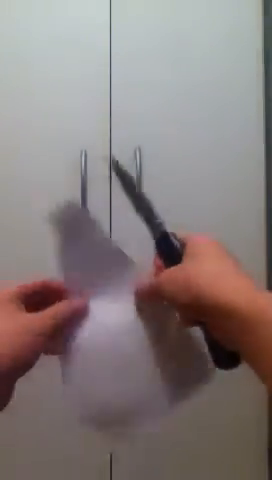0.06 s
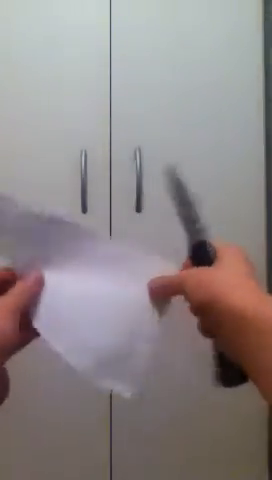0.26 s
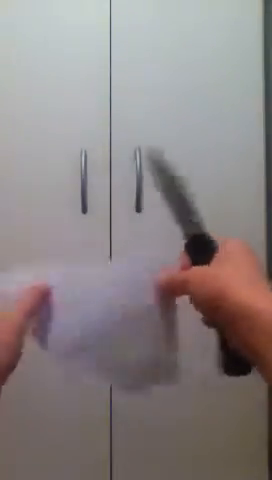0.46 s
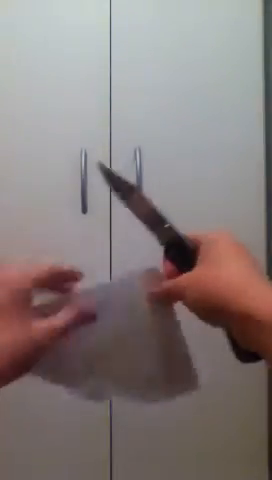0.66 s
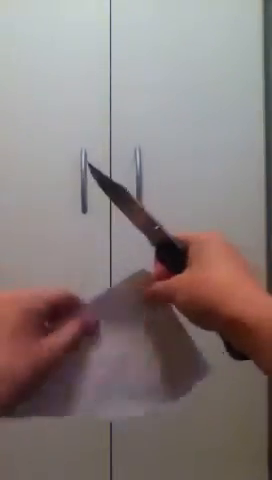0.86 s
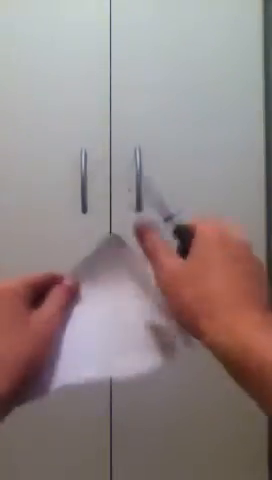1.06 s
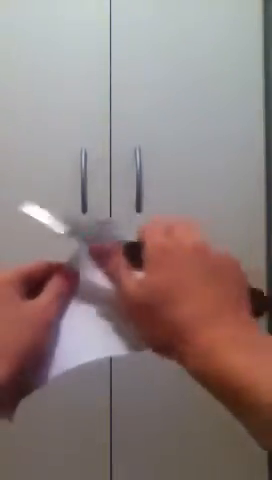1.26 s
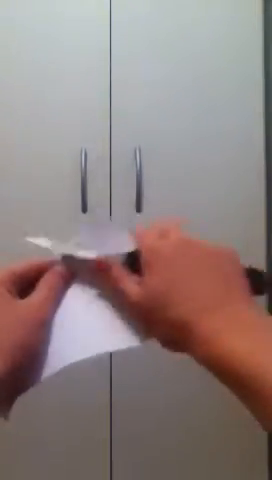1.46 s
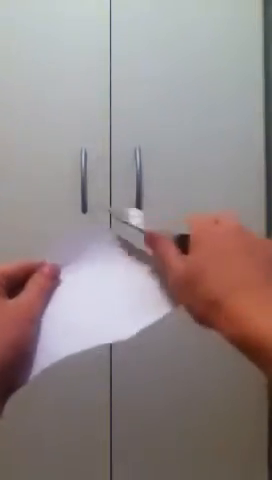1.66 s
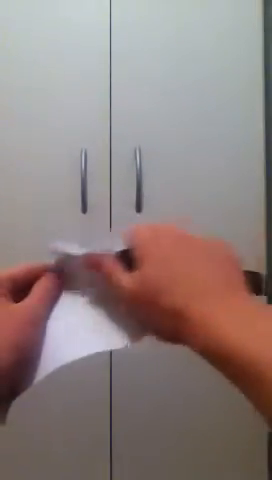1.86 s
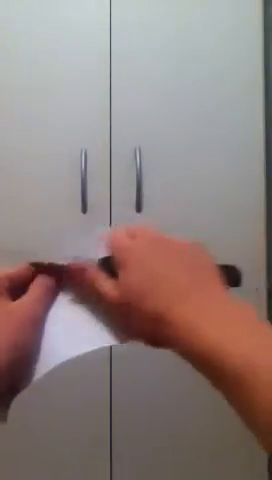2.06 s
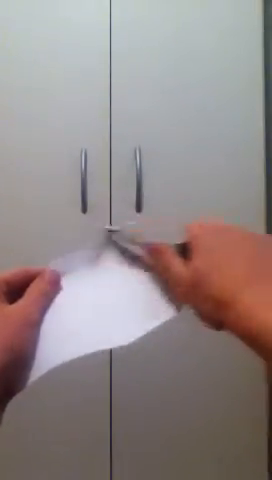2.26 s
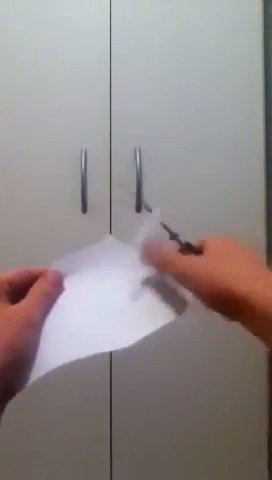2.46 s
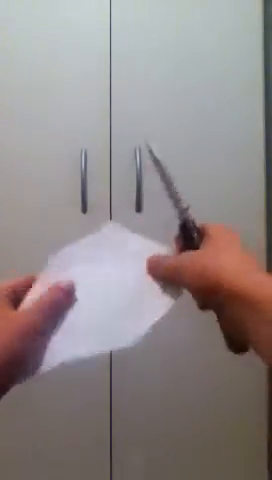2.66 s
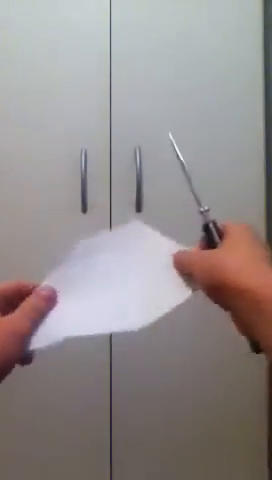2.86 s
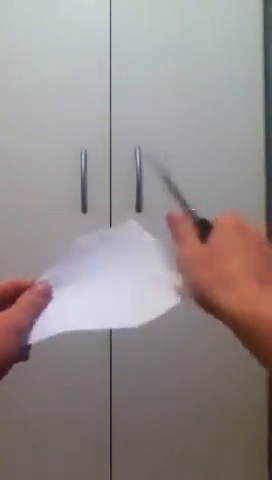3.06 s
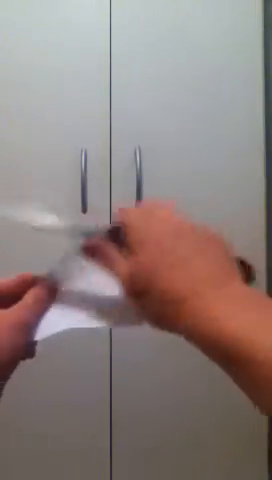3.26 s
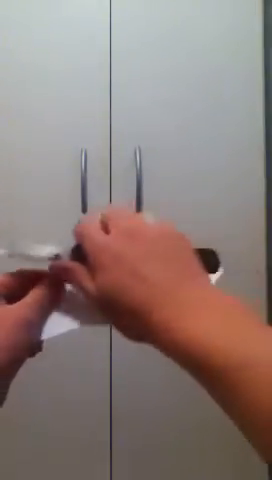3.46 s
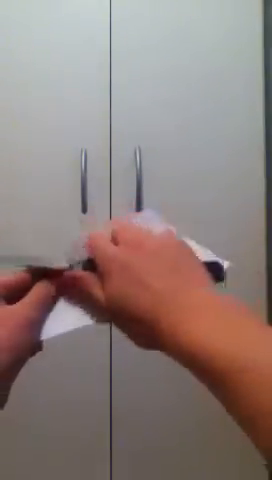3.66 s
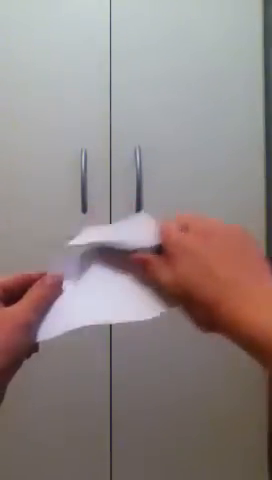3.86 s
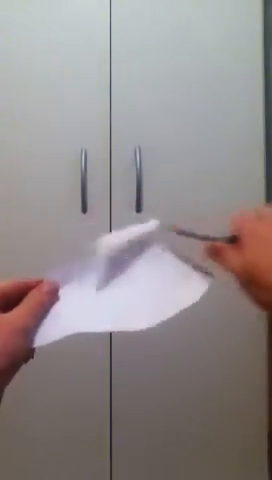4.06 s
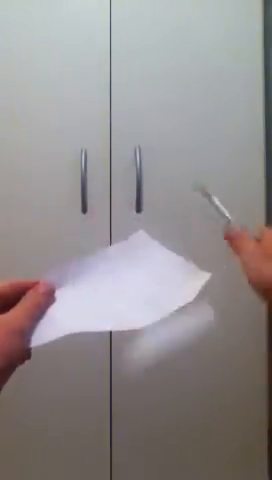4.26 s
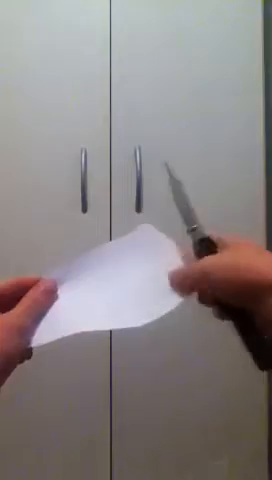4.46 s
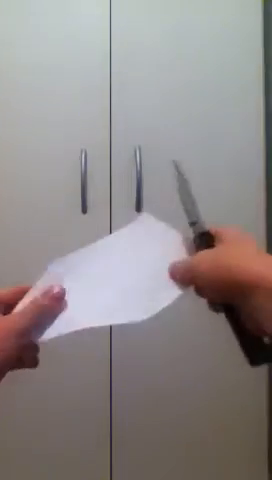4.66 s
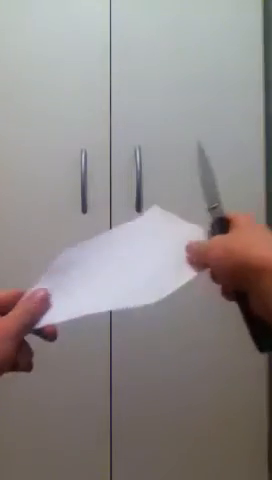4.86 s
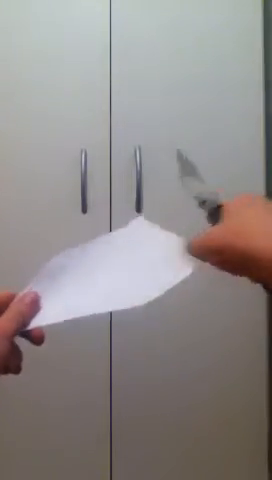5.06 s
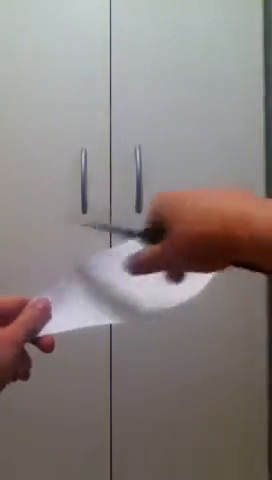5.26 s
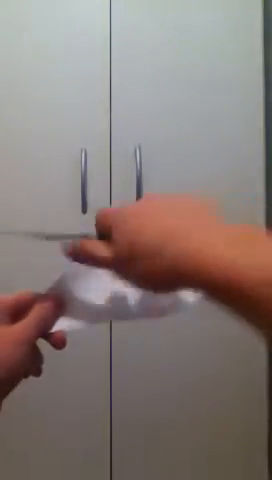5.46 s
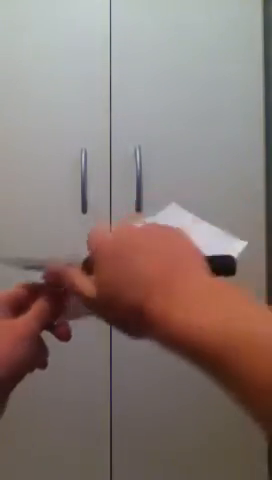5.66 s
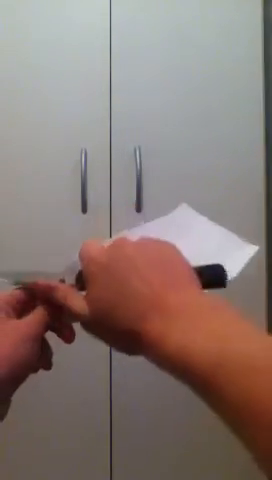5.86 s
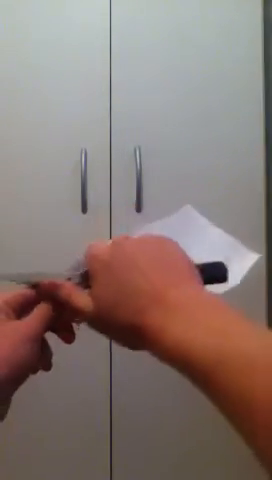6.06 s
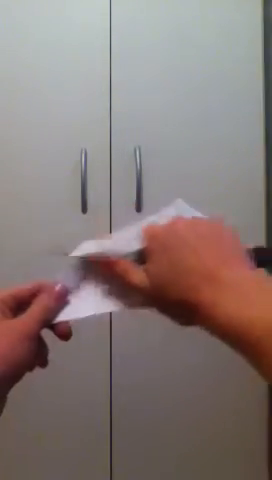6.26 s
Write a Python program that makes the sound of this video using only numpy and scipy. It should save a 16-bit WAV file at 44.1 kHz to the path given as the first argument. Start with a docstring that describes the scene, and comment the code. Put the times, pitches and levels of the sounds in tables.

```python
"""In a small quiet room, a sharp knife slices four strips off a hand-held sheet of paper.
Each cut is a dense run of snapping fibres, coloured by the sheet, with a zip from the loosening strip.
Between cuts the hand changes its grip: the sheet rustles, buckles with small snaps and flaps the air.
Near walls add a short echo, over a faint rumble, hiss and hum."""
import sys
import numpy as np
from scipy import signal
from scipy.fft import rfft, irfft
from scipy.io import wavfile
from scipy.ndimage import uniform_filter1d

SR = 44100
rng = np.random.default_rng(int(sys.argv[2]) if len(sys.argv) > 2 else 0)


def int16_out(signal):
    """Quantize to a 16-bit WAV file."""
    q = np.round(np.clip(np.atleast_2d(signal).T, -1, 1) * 32767)
    wavfile.write(sys.argv[1], SR, q.astype(np.int16))


N = 278271

# Paper levels are set before the mix in scene(). A tilt above 0 is brighter, below 0 duller.
# knife strokes: start t/s, peak t/s, end t/s, level/dB, entry below peak/dB, exit below peak/dB,
# tilt/(dB per octave), ring at the peak f/Hz, surge depth/dB, extra fizz at the exit/dB
KNIFE_STROKES = [(1.531, 1.606, 1.6735, -22.5, 11.5, 1.5, 0.53, 5440, 1.5, 2),
                 (2.146, 2.256, 2.327, -22.5, 14.5, 1.5, 1.2, 6460, 2, -4.5),
                 (3.766, 3.946, 4.106, -25, 13, 11, 1.04, 9000, 0.5, 12.5),
                 (6.142, 6.288, 6.54, -31, 18.5, 10, -0.1, 2980, -0.5, 0)]
# tone colour of the sheet as it is cut: f/Hz, level/dB
CUT_COLOUR = [(100, -37), (300, -20), (550, -15.5), (850, -15), (1020, -10), (1200, -18), (1500, -6.5),
              (1900, -6.5), (2600, -2), (3800, -2.5), (5300, -5.5), (8700, -6), (10800, -12.5),
              (15500, -20)]
# zips of the loosening strip: start t/s, length/s, level/dB, first f/Hz, last f/Hz
STRIP_ZIPS = [(1.647, 0.02, -20, 3500, 1660), (2.296, .031, -23.5, 4360, 1090),
              (3.798, 0.02, -44, 1010, 970), (4.06, 0.038, -43, 850, 373)]
# the sheet buckles or is tapped: t/s, level/dB, f/Hz, cycles to the peak, flutter fade time/s
BUCKLE_SNAPS = [(.082, -35, 4530, 0.4, 0.0034), (.098, -29, 1800, 0.38, .003),
                (0.1076, -25.5, 2770, 0.7, 0.0034), (0.1011, -40.5, 129, .3, 0.0006),
                (0.124, -39, 1190, 0.43, 0.014), (0.1545, -38, 1860, 0.64, .0018),
                (0.197, -29, 7050, 0.36, 0.0064), (0.3054, -32.5, 1640, 0.48, 0.0014),
                (0.414, -27.5, 6400, 0.3, .0025), (.851, -30.5, 4100, .21, 0.0019),
                (.973, -26.5, 3340, 0.38, 0.00057), (1.902, -23.5, 3430, 1.01, 0.0015),
                (1.921, -28.5, 3470, 0.53, 0.0034), (2.6136, -38, 2180, 0.23, .0006),
                (2.6275, -28, 2720, 0.41, 0.023), (2.6354, -8, 3360, 0.47, 0.00011),
                (2.6431, -14, 6250, 0.73, 0.00081), (2.7077, -21.5, 4850, 0.45, 0.0017),
                (2.744, -18, 7150, 0.83, 0.0023), (2.7457, -25.5, 1520, 0.29, 0.0016),
                (2.877, -39.5, 1210, .56, 0.0041), (3.766, -30, 4000, 1.5, .006),
                (4.228, -37, 3000, 0.17, 0.0034), (4.331, -39, 1880, 1.55, 0.0007),
                (4.5673, -30, 3630, 0.17, 0.0018), (4.745, -29, 5750, 0.28, .0012),
                (4.881, -31, 2850, 0.63, .0025), (4.884, -38.5, 745, 1.45, .001),
                (4.885, -29.5, 1600, 0.31, .001), (5.933, -26, 5410, .4, 0.00031)]
# fingers slide on the sheet: peak t/s, level/dB, fade time/s, tilt/(dB per octave)
FINGER_SLIDES = [(.03, -55.5, 0.073, -1), (.122, -48, 0.042, -3.5), (.225, -50, 0.12, 0.5),
                 (.43, -55, 0.14, -3.5), (0.858, -50.5, 0.0084, 0), (0.973, -45, 0.019, 3),
                 (1.115, -52.5, 0.031, 2), (2.638, -42, 0.006, -.5), (2.675, -40.5, 0.04, 0.8),
                 (2.761, -48, 0.13, 1), (2.905, -49, 0.026, 0), (3.469, -57, 0.037, 2),
                 (4.246, -51.5, 0.011, 3.5), (4.305, -57, 0.15, -1.5), (4.535, -53, 0.085, 0),
                 (4.775, -55.5, 0.074, 1), (4.885, -47.5, 0.038, 0.5)]
# tone colour of sliding fingers: f/Hz, level/dB
SLIDE_COLOUR = [(100, -8), (400, 7.5), (1000, -1), (1600, 2.5), (3000, 1), (5000, -0.5), (8000, 1),
                (11000, -5.5), (15500, -19)]
# the whole sheet flaps: t/s, level/dB, fade time/s
SHEET_FLAPS = [(0.098, -39, 0.014), (.306, -46, 0.02), (.415, -47.5, 0.054), (.85, -40.5, 0.01),
               (2.619, -50, 0.011), (2.746, -44, .012), (4.09, -48, 0.021), (4.54, -53, 0.078),
               (4.880, -41.5, 0.014)]
# tone colour of a flap: f/Hz, level/dB
FLAP_COLOUR = [(40, -35), (130, -5.5), (280, 2.5), (450, 0.5), (750, -7.5), (1300, -12), (4000, -26.5)]
# narrow resonances in all the paper sounds: f/Hz, width/Hz, level against the direct sound/dB
RESONANCES = [(1010, 140, -5.5), (1500, 310, -2), (2006, 32, -3), (2380, 104, -3.5), (2670, 120, -5.5),
              (2930, 90, -6.5), (3110, 46, -5.5), (3670, 14, -33), (3900, 26, -19), (3900, 43, -4),
              (6700, 150, -15), (8560, 290, -12.5)]
# how long the room echoes: f/Hz, time to fade by 60 dB/s
ECHO_TIMES = [(200, 0.45), (1300, 0.17), (3500, 0.16), (9000, 0.19), (15000, 0.19)]
# tone colour of room rumble and microphone hiss: f/Hz, level/dB
BACKGROUND_COLOUR = [(15, -83), (25, -53), (43, -7.5), (91, -3.5), (119, -2), (152, -4), (209, -3.5),
                     (305, -4), (469, -9.5), (509, -9), (684, -13.5), (2010, -17.5), (3440, -20),
                     (7500, -18.5), (15500, -24)]
# tones of the faint room hum: f/Hz, level/dB
HUM_TONES = [(60, -77), (91, -71), (151, -72)]


def knife_cuts(catch_db=0.66, catch_s=0.003, flex_db=3.0, ring_db=3.5, fizz_hz=13500, dull_s=0.01):
    """The blade snaps fibres by the thousand; more force makes the paper ring higher and brighter."""
    out, t = np.zeros(N), np.arange(N) / SR
    hz, frame_s, snaps = signal.stft(fibres(N, per_s=16000, spread_db=2.0), SR, nperseg=384)
    # the edge catches and runs free every few milliseconds
    jitter = signal.lfilter([1], [1, -np.exp(-1 / (catch_s * SR))], rng.standard_normal(N))
    catch = amp(catch_db * unit(jitter))
    # the flexing sheet keeps shifting its small resonances
    flex = uniform_filter1d(rng.standard_normal(snaps.shape), size=4, axis=0)
    flex = unit(uniform_filter1d(flex, size=5, axis=1))
    sheet_db = curve_at(CUT_COLOUR, hz)[:, None] + flex_db * flex
    for start, peak, end, db, entry_db, exit_db, tilt, ring_hz, surge_db, fizz_db in KNIFE_STROKES:
        force_db = blade_force(frame_s, start, peak, end, entry_db, exit_db, surge_db)
        centre_hz = ring_hz * 2 ** (0.23 * force_db)  # 0.23 octaves higher for each dB of force
        ring = ring_db * bell(hz, centre_hz, width_octaves=0.2)
        dull = np.exp(np.minimum(frame_s - end, 0) / dull_s)  # the treble goes first as the edge leaves
        bright = (tilt + 0.2 * force_db - dull) * octaves(hz, hz[-1])[:, None]
        run_out = np.clip((frame_s - peak) / (end - peak), 0, 1)
        fizz = fizz_db * run_out * bell(hz, fizz_hz, width_octaves=0.48)  # thin hiss as the stroke ends
        level = amp(db + np.interp(t, frame_s, force_db)) * blade_contact(t, start, end)
        out += fibre_hiss(snaps, amp(sheet_db + bright + ring + fizz)) * catch * level
    return out


def blade_force(t, start, peak, end, entry_db, exit_db, surge_db, surge_hz=24.5):
    """Force in dB: one arch, with surges as the sheet gives and tightens against the blade."""
    before = np.clip((peak - t) / (peak - start), 0, 1)
    after = np.clip((t - peak) / (end - peak), 0, 1)
    surge = surge_db * np.cos(2 * np.pi * surge_hz * (t - peak))
    return surge - entry_db * before ** 2 - exit_db * after ** 2


def blade_contact(t, start, end, bite_s=0.0072, release_s=0.003):
    """Rises to 1 as the edge bites in; fades as the sheet rings on after it leaves."""
    return np.clip((t - start) / bite_s, 0, 1) * np.exp(-np.maximum(t - end, 0) / release_s)


def strip_zips(fade_db=5, sag_power=2.45):
    """The last fibres give way, and the ring of the loosening strip drops ever faster and fades."""
    out, t = np.zeros(N), np.arange(N) / SR
    hz, frame_s, snaps = signal.stft(fibres(N, per_s=13000, spread_db=1.0), SR, nperseg=384)
    for start, length, db, first_hz, last_hz in STRIP_ZIPS:
        slack = np.clip((frame_s - start) / length, 0, 1) ** sag_power
        centre_hz = first_hz * (last_hz / first_hz) ** slack
        ring = bell(hz, centre_hz, width_octaves=0.41)
        level = amp(db - fade_db * np.interp(t, frame_s, slack)) * blade_contact(t, start, start + length)
        out += fibre_hiss(snaps, ring) * level
    return out


def fibres(size, per_s, spread_db):
    """Tiny clicks of uneven strength at random times, like fibres snapping."""
    chance, strength, sign = rng.random(size), rng.exponential(1, size), rng.choice([-1, 1], size)
    return (chance < per_s / SR) * sign * amp(spread_db * np.minimum(strength, 4))


def fibre_hiss(snaps, colour):
    """Turns short spectra of fibre clicks into an even hiss whose colour moves."""
    spectra = snaps * colour / np.linalg.norm(colour, axis=0)
    return unit(signal.istft(spectra, SR, nperseg=384)[1][:N])


def buckles(equal_energy_s=0.0019, cutoff_hz=10500):
    """Each buckle is one short snap, which then flutters back and forth through the sheet."""
    out, t = np.zeros(N), np.arange(2048) / SR
    rows = creases() + BUCKLE_SNAPS
    for (s, db, hz, cycles, fade_s), noise in zip(rows, rng.standard_normal((len(rows), len(t)))):
        swell = (hz * t / cycles) ** 2 * np.exp(-2 * hz * t / cycles)
        wave = np.sin(2 * np.pi * (hz * t - cycles))
        snap = swell * (wave - np.average(wave, weights=swell))  # a free sheet pushes no air overall
        flutter = signal.fftconvolve(noise * np.exp(-t / fade_s), snap)[:len(t)]
        # a flutter that fades in equal_energy_s holds as much energy as its snap
        flutter *= np.sqrt(fade_s / equal_energy_s) * np.linalg.norm(snap) / np.linalg.norm(flutter)
        gain = amp(db) / abs(snap).max()
        add(out, s, gain * snap)
        add(out, s + 2 * cycles / hz, gain * flutter)
    return signal.lfilter(*signal.butter(2, cutoff_hz, fs=SR), out)


def creases(start_s=2.668, length_s=0.04, count=8, db=-22.5, hz=6200, cycles=0.54, flutter_s=0.0008):
    """Fingers crease the sheet in one quick, uneven run of snaps: more rows for buckles()."""
    rows = []
    for k, (late, strength, pitch) in enumerate(rng.random((count, 3))):
        s = start_s + length_s * (k + late) / count
        snap_db = db + 2 * (2 * strength - 1)  # up to 2 dB either way
        snap_hz = hz * 2 ** (0.22 * (2 * pitch - 1))  # up to 0.22 octaves either way
        rows.append((s, snap_db, snap_hz, cycles, flutter_s))
    return rows


def rustles(rise_s=0.02):
    """Skin slips over the paper grain in brief swells of fine crackle."""
    out, t = np.zeros(N), np.arange(-SR // 4, SR // 4) / SR
    for s, db, fade_s, tilt in FINGER_SLIDES:
        grain = coloured(fibres(len(t), per_s=5000, spread_db=2.5), SLIDE_COLOUR, tilt)
        swell = np.exp(np.minimum(t / rise_s, -t / fade_s))
        add(out, s + t[0], (amp(db) * grain * swell)[t + s >= 0])
    return out


def flaps(rise_s=0.00043):
    """The sheet pushes a soft, low puff of air each time it swings over."""
    out, t = np.zeros(N), np.arange(8192) / SR
    for s, db, fade_s in SHEET_FLAPS:
        puff = coloured(rng.standard_normal(len(t)), FLAP_COLOUR)
        add(out, s, amp(db) * puff * (1 - np.exp(-t / rise_s)) * np.exp(-t / fade_s))
    return out


def resonances(x):
    """Lets the paper sounds ring a little at a few fixed pitches."""
    return x + sum(amp(db) * signal.lfilter(*signal.iirpeak(hz, hz / width, SR), x)
                   for hz, width, db in RESONANCES)


def room_echo(x, echo_db=-11.0, first_echo_s=0.00371):
    """Cupboard doors and near walls send back a short, dense echo whose bass lasts longest."""
    t = np.arange(SR // 2) / SR
    bounces = fibres(len(t), per_s=4400, spread_db=-2.0) * (t > first_echo_s)  # one click per echo
    hz, frame_s, spectra = signal.stft(bounces, SR, nperseg=128)
    fade = amp(-60 * frame_s / curve_at(ECHO_TIMES, hz)[:, None])
    tail = signal.istft(spectra * fade, SR, nperseg=128)[1]
    return x + amp(echo_db) * signal.fftconvolve(x, tail / np.linalg.norm(tail))[:N]


def background(waver_hz=0.68, noise_db=-58):
    """Steady rumble and hiss, with a faint hum that wavers in pitch."""
    hum, t = np.zeros(N), np.arange(N) / SR
    drifts = uniform_filter1d(rng.standard_normal((len(HUM_TONES), N)), size=8000, axis=1)
    for (hz, db), drift in zip(HUM_TONES, drifts):
        cycles = hz * t + waver_hz * np.cumsum(unit(drift)) / SR
        hum += amp(db) * np.sqrt(2) * np.sin(2 * np.pi * cycles)
    return hum + amp(noise_db) * coloured(rng.standard_normal(N), BACKGROUND_COLOUR)


def amp(db):
    """Turns decibels into a number to multiply by."""
    return 10 ** (np.asarray(db) / 20)


def unit(x):
    """Scales x to an average strength (rms) of 1."""
    return x / np.sqrt(np.mean(x ** 2) + 1e-20)


def curve_at(points, hz):
    """Joins (f/Hz, value) points on an octave scale and gives the value at hz."""
    f, value = np.transpose(points)
    return np.interp(np.log(hz + 1), np.log(f + 1), value)


def add(mix, s, sound):
    """Mixes a sound in at s seconds."""
    part = mix[max(round(s * SR), 0):][:len(sound)]
    part += sound[:len(part)]


def octaves(hz, centre_hz):
    """Octaves above a centre; anything under 200 Hz counts as 200 Hz."""
    return np.log2(np.maximum(hz, 200) / centre_hz)


def bell(hz, centre_hz, width_octaves):
    """A hump of height 1 around a still or moving pitch."""
    return np.exp(-.5 * (octaves(hz[:, None], centre_hz) / width_octaves) ** 2)


def coloured(x, colour, tilt=0):
    """Gives x a tone colour, tilted in dB per octave, at strength 1."""
    hz = np.fft.rfftfreq(len(x), 1 / SR)
    gain = amp(curve_at(colour, hz) + tilt * octaves(hz, 1000))
    return unit(irfft(rfft(x) * gain, len(x)))


def scene():
    """Mixes the cutting and handling in the room, over its background, in one channel."""
    snaps = amp(-1.3) * buckles()
    cutting = amp(-1.76) * (knife_cuts() + strip_zips())
    paper = cutting + snaps + amp(-0.6) * rustles() + flaps()
    return (room_echo(resonances(paper)) + background())[None]


def record(dry, cutoff_hz=15950):
    """Takes away the very highest treble."""
    low_pass = signal.firwin(511, cutoff_hz, window=("kaiser", 9), fs=SR)
    return signal.oaconvolve(dry, low_pass[None], "same")


dry = scene()
out = record(dry)
int16_out(out)
```